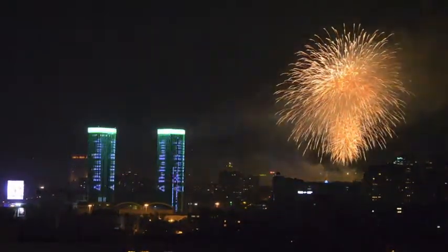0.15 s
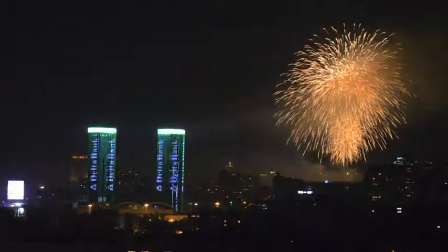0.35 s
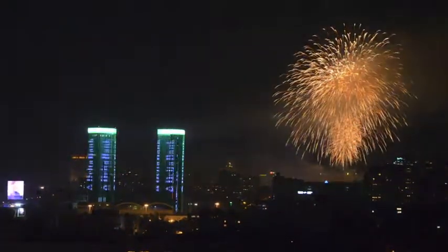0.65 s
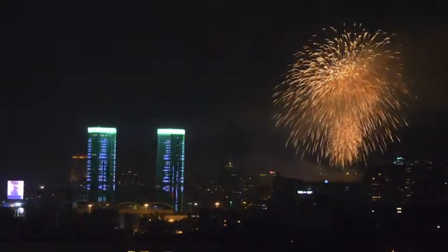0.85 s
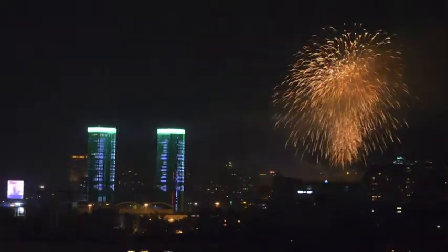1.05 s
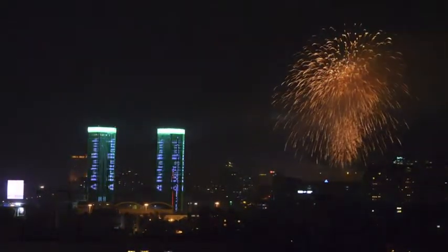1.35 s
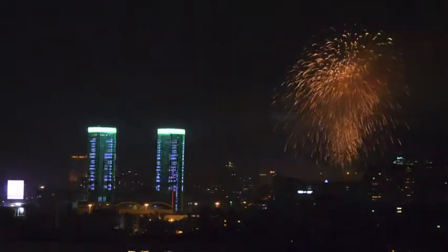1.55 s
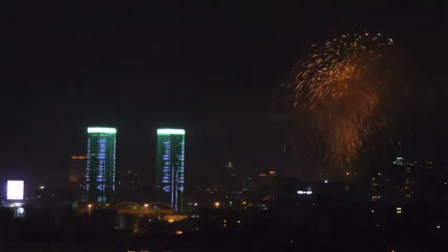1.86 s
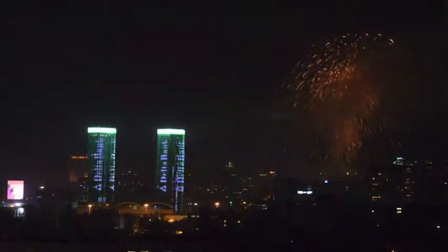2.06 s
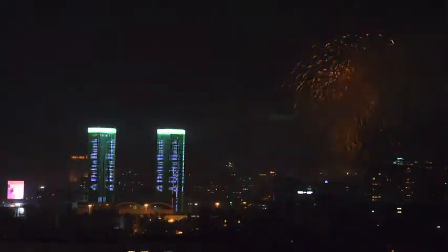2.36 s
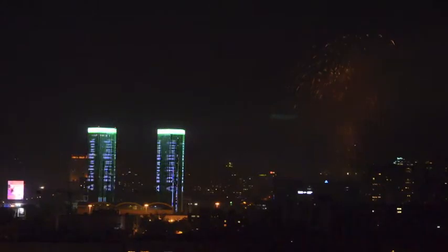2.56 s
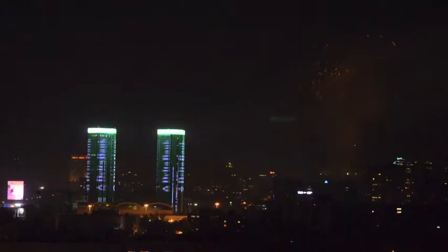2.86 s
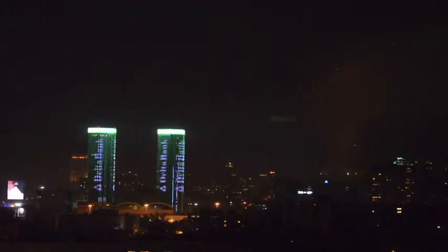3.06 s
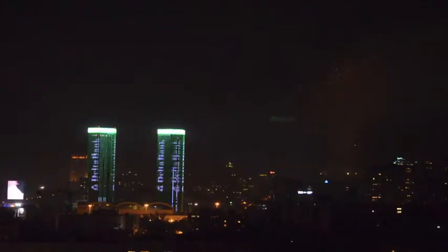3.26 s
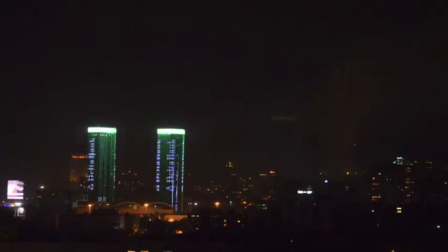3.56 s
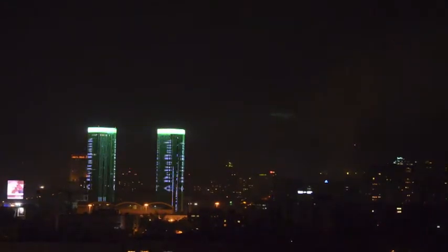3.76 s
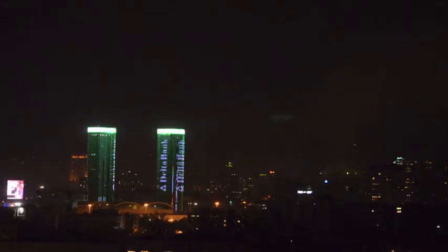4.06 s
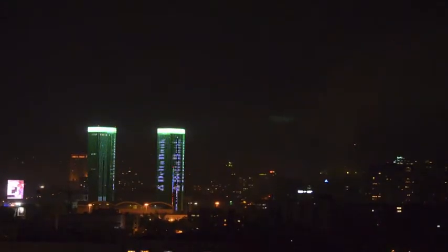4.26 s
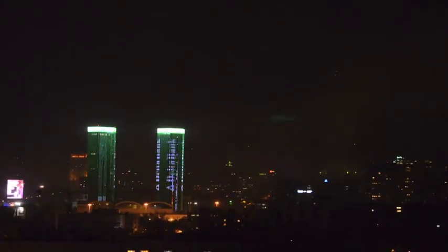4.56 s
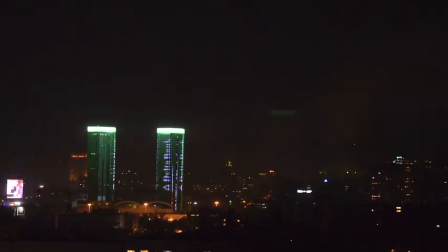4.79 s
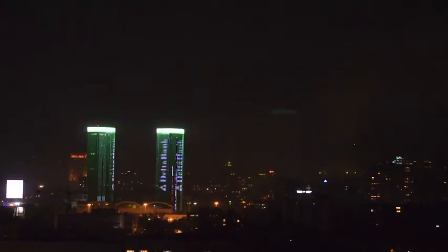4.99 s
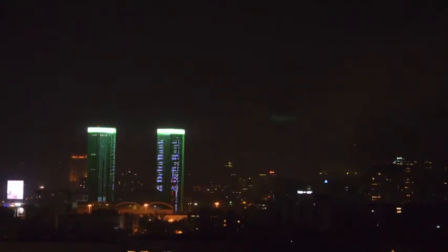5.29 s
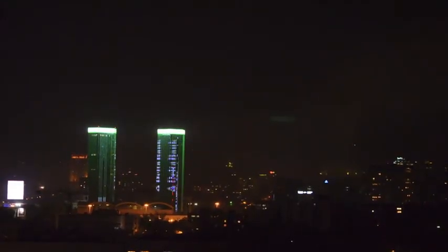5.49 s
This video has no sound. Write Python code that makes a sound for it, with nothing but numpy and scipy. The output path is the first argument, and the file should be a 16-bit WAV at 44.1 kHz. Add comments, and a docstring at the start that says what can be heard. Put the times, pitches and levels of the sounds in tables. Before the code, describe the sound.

Firework shells burst far off over a city at night, heard from a balcony. A soft thud comes first, then about nine uneven booms, some in quick pairs or clusters. Each rings briefly off nearby walls and rolls away in a long echo, and the loudest overload the microphone with a crack. Traffic rumbles steadily underneath with light hiss. Near the end a car swells past faintly and a small click precedes one last loud boom.

```python
"""Firework shells burst far off over a city at night, heard from a balcony above steady traffic.
Each blast is one pressure pulse that sets the balcony booming, scatters off nearby walls and rolls
back from the city. The loudest overload the microphone and crack.
Below, engines rumble, tyres roar, one car passes and two faint squeals rise from the street.
The camera whines faintly and ticks once; the microphone hisses."""
import sys
import numpy as np
from scipy import signal
from scipy.fft import rfft, irfft, next_fast_len
from scipy.io import wavfile

SR = 44100
rng = np.random.default_rng(int(sys.argv[2]) if len(sys.argv) > 2 else 0)


def waveform_to_disk(signal):
    """Save audio, clipped to [-1, 1], as 16-bit WAV at the path in sys.argv[1]."""
    frames = np.transpose(np.atleast_2d(signal))
    scaled = np.clip(frames, -1, 1) * 32767
    samples = np.round(scaled).astype(np.int16)
    wavfile.write(sys.argv[1], SR, samples)


N = 248283
TIME_S = np.arange(N) / SR

# Shell bursts: arrival_s, level_db, pulse_ms, front_cutoff_hz, wall_scatter_db
SHELLS = [(0.222, -14, 2.9, 500, 4.5), (1.0273, 3, 3.84, 900, 3), (1.0293, 0.5, 3.7, 700, -0.5),
          (1.9188, 5.5, 2.33, 647, -4), (2.1314, 7, 1.98, 378, -2.5), (3.2078, 2.2, 1.34, 1500, 1.5),
          (3.393, -6, 1.45, 500, 8.5), (3.717, -6, .45, 1300, -10), (3.894, -4, 1.57, 1500, 3.5),
          (4.115, -13.5, 2.1, 253, 13), (5.2192, 6, 2.2, 378, 1.5)]
def fireworks(walls_db=-10, city_db=-18):
    """Each blast arrives directly, off nearby walls and, later, off the city."""
    direct, scattered = np.zeros((2, N))
    for arrival_s, level_db, pulse_ms, front_cutoff_hz, wall_scatter_db in SHELLS:
        pulse = from_db(level_db) * blast(arrival_s, pulse_ms, front_cutoff_hz)
        direct += pulse
        scattered += from_db(wall_scatter_db) * pulse
    walls = from_db(walls_db) * echoes(scattered, t60_s=0.41, build_s=0.0023)
    city = from_db(city_db) * echoes(direct, t60_s=2.44, build_s=0.084)
    return balcony(flutter(direct) + city) + walls


def blast(arrival_s, pulse_ms, front_cutoff_hz, air_cutoff_hz=1400):
    """A short dip, a shock front and the suction behind it, rounded by a long air path."""
    age = np.clip((TIME_S - arrival_s) / (pulse_ms / 1000), -50, 50)  # in pulse lengths
    dip = -0.8 * np.exp(-abs(age) / 0.31)
    shock = (1 - age) * np.exp(-abs(age))
    pulse = np.where(age > 0, shock, dip)
    path = np.vstack([butter(60, "high", order=1),
                      butter(front_cutoff_hz, "low", order=1),
                      butter(air_cutoff_hz, "low", order=4)])
    return signal.sosfilt(path, pulse + 1e-18)


# Balcony and facade reflections: delay_ms, gain_db
REFLECTIONS = [(4.6, -16), (8.9, -6), (11.8, -15.5), (21.6, -8), (30.8, -21.5), (41.8, -16), (51.6, -17)]
def flutter(x):
    """Close hard surfaces repeat each pulse in quick succession."""
    return x + sum(from_db(gain_db) * np.interp(TIME_S - delay_ms / 1000, TIME_S, x)
                   for delay_ms, gain_db in REFLECTIONS)


# Balcony air modes: pitch_hz, gain_db, t60_s
BALCONY_MODES = [(55, 10.5, 0.21), (100.3, 16.5, .22), (138.6, 4.5, 0.25), (176, 3, 0.21),
                 (198.6, -1.5, 0.58), (231, 4, 0.3), (262.6, -2, 0.21), (332.4, 6, 0.39),
                 (367.5, 6.5, 0.28), (599, 3, .2), (690, 2, 0.31)]
def balcony(x):
    """The air between floor, ceiling and walls rings on top of the direct sound."""
    return x + sum(from_db(gain_db) * resonate(x, pitch_hz, t60_s)
                   for pitch_hz, gain_db, t60_s in BALCONY_MODES)


# Wall and city echo spectrum: freq_hz, gain_db
ECHO_SPECTRUM = [(30, -9), (80, -15), (180, 4.5), (400, 0), (900, 1.5), (1500, -5), (3000, -16.5)]
def echoes(x, t60_s, build_s):
    """Dense reflections build up and die away."""
    envelope = (1 - np.exp(-TIME_S / build_s)) * decay(TIME_S, t60_s)
    response = coloured_noise(ECHO_SPECTRUM) * envelope / np.sqrt(np.sum(envelope ** 2))
    return signal.fftconvolve(x, response)[:N]


# Engine and tyre spectra: freq_hz, density_db
ENGINE_SPECTRUM = [(20, -26), (38, -17), (55, -11.5), (78, 0.5), (100, -5), (130, 1.5), (200, 2),
                   (300, 0.5), (450, -6.5), (650, -17.5), (1000, -24)]
TYRE_SPECTRUM = [(200, -8), (450, -1), (700, -1.5), (850, 0), (1000, 1.5), (1250, -5), (1600, -13),
                 (2050, -17.5), (2350, -31), (3000, -41), (4200, -52.5), (8000, -64.5)]
def traffic(engines_db=-27, tyres_db=-26):
    """Far engines rumble through the balcony modes; tyres roar steadily."""
    engines = from_db(engines_db) * unit_rms(balcony(coloured_noise(ENGINE_SPECTRUM)))
    tyres = from_db(tyres_db) * coloured_noise(TYRE_SPECTRUM)
    return engines + tyres


# Tyre spectrum of the passing car: freq_hz, density_db
PASSING_SPECTRUM = [(400, -11.5), (1000, 3), (1400, -5), (2050, -18), (2600, -26), (3400, -35),
                    (4500, -51.5)]
def passing_car(closest_s=5.02, half_power_s=1.33, closest_db=-30):
    """One car's tyre roar swells and fades as 1 / distance."""
    nearness = 1 / np.hypot(1, (TIME_S - closest_s) / half_power_s)
    return from_db(closest_db) * nearness * coloured_noise(PASSING_SPECTRUM)


# Street squeals: start_s, level_db
SQUEALS = [(2.78, -53.5), (3.519, -58.5)]
# Squeal resonances: pitch_hz, t60_s, gain_db
SQUEAL_MODES = [(2730, 0.019, 1), (3050, 0.012, -9), (3330, 0.013, -5.5)]
def squeals(attack_s=0.16, hold_s=0.14, release_t60_s=1.6):
    """Far whistling, perhaps brakes: noise in narrow resonances swells, holds and dies away."""
    noise = rng.standard_normal(N)
    tone, envelope = np.zeros((2, N))
    for pitch_hz, t60_s, gain_db in SQUEAL_MODES:
        band = resonate(noise, pitch_hz, t60_s)
        tone += from_db(gain_db) * resonate(band, pitch_hz, t60_s)
    for start_s, level_db in SQUEALS:
        swell = np.clip((TIME_S - start_s) / attack_s, 0, 1)
        release_age_s = np.maximum(TIME_S - start_s - attack_s - hold_s, 0)
        envelope += from_db(level_db) * swell * decay(release_age_s, release_t60_s)
    return envelope * unit_rms(tone)


# Camera tick: start_s, ring_db, snap_db
TICK = (4.9674, -23, -30)
# Camera body modes: pitch_hz, gain_db, t60_s
BODY_MODES = [(2050, 2, 0.017), (2600, -0.5, 0.012), (2930, 1, 0.017), (3710, -2, 0.017),
              (3930, -11, 0.027), (5350, -12, 0.0064), (8400, -12, .007), (12300, -6, 0.0046)]
# Snap spectrum: freq_hz, density_db
SNAP_SPECTRUM = [(1200, -2), (2000, 4), (3700, -3), (4400, -18), (9000, -13), (10500, -25), (12400, -14),
                 (15000, -27)]
def camera_tick(snap_t60_s=0.014):
    """The plastic body clicks once: a dry snap and a short ring."""
    start_s, ring_db, snap_db = TICK
    age_s = np.maximum(TIME_S - start_s, 0)
    ring = sum((-1) ** k * from_db(gain_db) * np.sin(2 * np.pi * pitch_hz * age_s) * decay(age_s, t60_s)
               for k, (pitch_hz, gain_db, t60_s) in enumerate(BODY_MODES))
    snap = (age_s > 0) * coloured_noise(SNAP_SPECTRUM) * decay(age_s, snap_t60_s)
    return from_db(ring_db) * ring + from_db(snap_db) * snap


def camera_whine(pitch_hz=15714, rms_db=-70.5):
    """The electronics give off a thin steady tone."""
    return from_db(rms_db) * np.sqrt(2) * np.sin(2 * np.pi * pitch_hz * TIME_S)


# Microphone noise spectrum: freq_hz, density_db
HISS_SPECTRUM = [(1500, -19), (2400, 6.5), (2900, -1.5), (3150, -2.5), (3450, -7), (3900, -10.5),
                 (4300, -14.5), (5300, -20), (7000, -22.5), (10000, -22.5), (15000, -28)]
def microphone_hiss(rms_db=-56.5):
    """The microphone's steady self-noise."""
    return from_db(rms_db) * coloured_noise(HISS_SPECTRUM)


def coloured_noise(spectrum):
    """Unit-rms noise shaped by (freq_hz, db) points, falling 12 dB per octave beyond them."""
    points_hz, points_db = np.transpose(spectrum)
    size = next_fast_len(N)
    freq_hz = np.maximum(np.fft.rfftfreq(size, 1 / SR), 1)
    gain = from_db(np.interp(np.log(freq_hz), np.log(points_hz), points_db))
    skirts = np.minimum(freq_hz / points_hz[0], 1) ** 2 * np.minimum(points_hz[-1] / freq_hz, 1) ** 2
    white = rfft(rng.standard_normal(size))
    return unit_rms(irfft(white * gain * skirts, size)[:N])


def resonate(x, pitch_hz, t60_s):
    """Two-pole resonance, unit peak gain."""
    radius = decay(1 / SR, t60_s)
    zeros = np.array([1, 0, -1]) * (1 - radius ** 2) / 2
    poles = [1, -2 * radius * np.cos(2 * np.pi * pitch_hz / SR), radius ** 2]
    return signal.lfilter(zeros, poles, x + 1e-18)


def butter(cutoff_hz, kind, order):
    """Butterworth sections."""
    return signal.butter(order, cutoff_hz, kind, fs=SR, output="sos")


def decay(age_s, t60_s):
    """Gain falling 60 dB per t60_s."""
    return from_db(-60 * np.minimum(age_s / t60_s, 10))


def from_db(db):
    """Decibels to gain."""
    return 10 ** (db / 20)


def unit_rms(x):
    """Scale to rms 1."""
    return x / np.sqrt(np.mean(x ** 2) + 1e-20)


def scene():
    """Fireworks over the city, mono."""
    outdoors = fireworks() + traffic() + passing_car() + squeals()
    return (outdoors + camera_tick() + camera_whine() + microphone_hiss())[None]


def record(dry, ceiling=0.99, cutoff_hz=16000):
    """The loudest blasts overload the input; a steep low-pass cuts the top."""
    clipped = np.clip(dry, -ceiling, ceiling)
    lowpass = signal.ellip(10, 0.1, 80, cutoff_hz, fs=SR, output="sos")
    return signal.sosfilt(lowpass, clipped)


dry = scene()
out = record(dry)
waveform_to_disk(out)
```